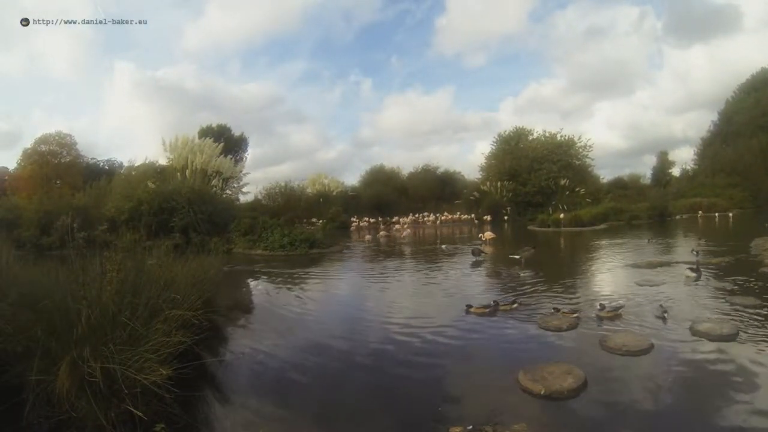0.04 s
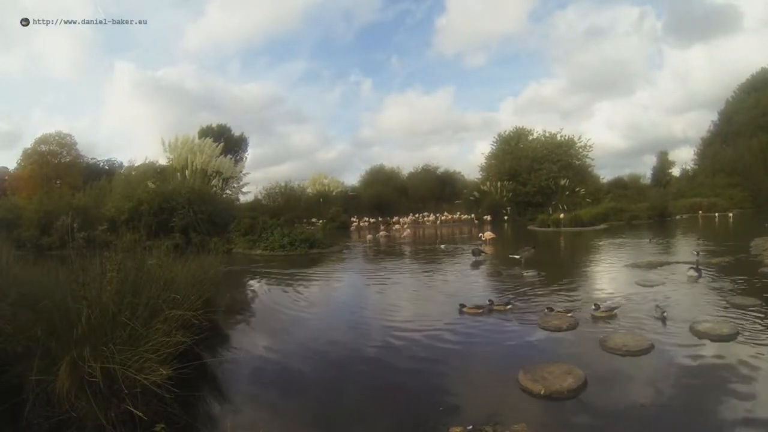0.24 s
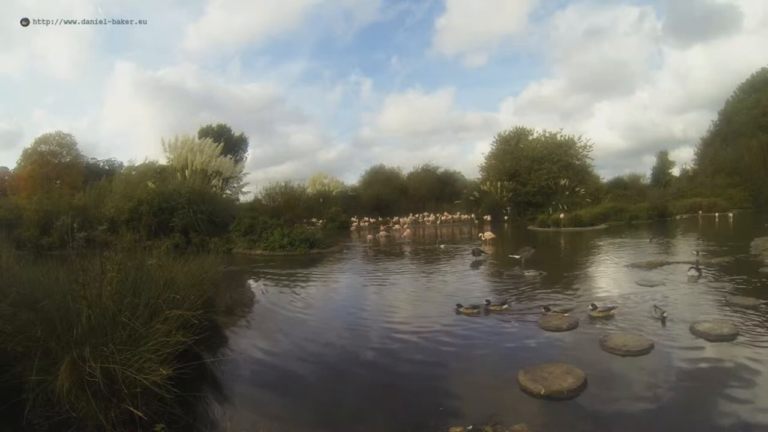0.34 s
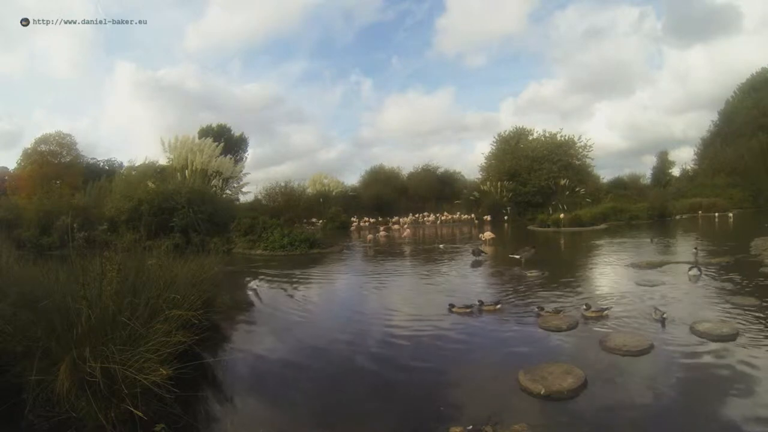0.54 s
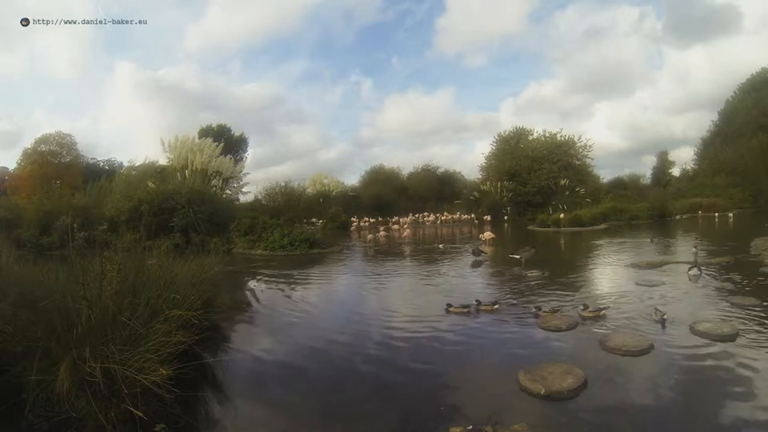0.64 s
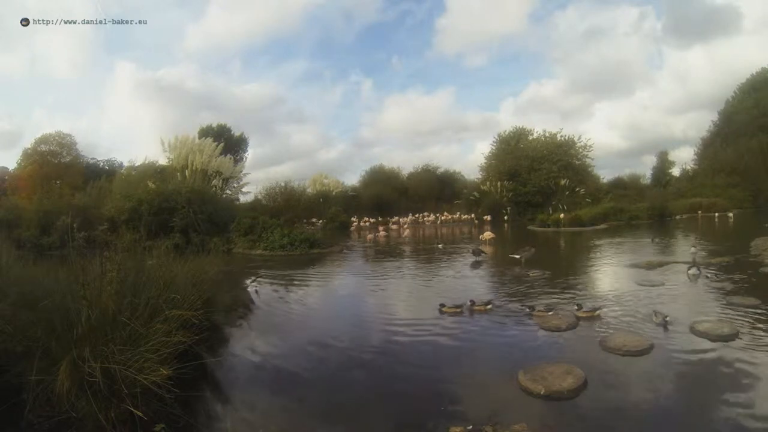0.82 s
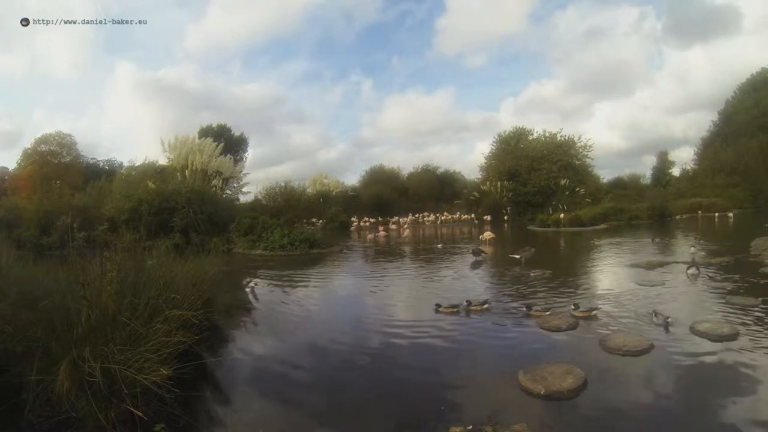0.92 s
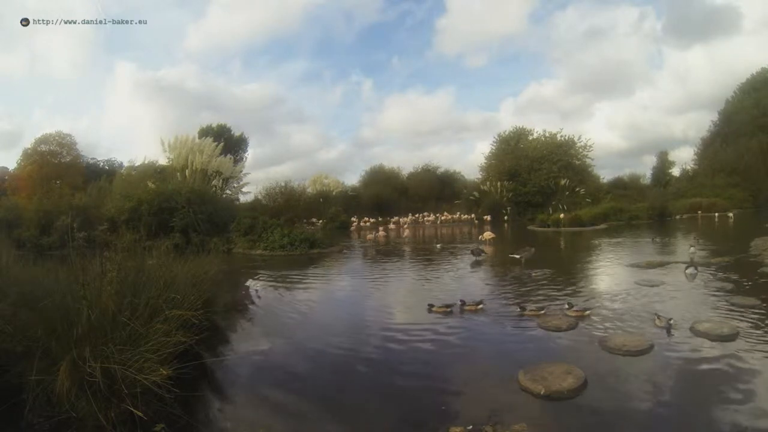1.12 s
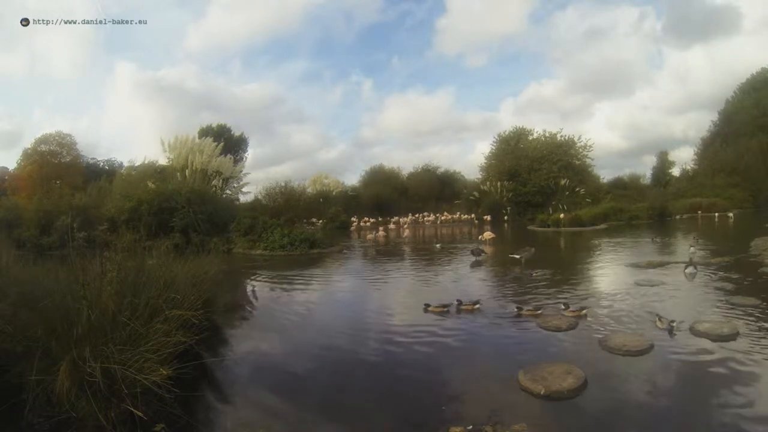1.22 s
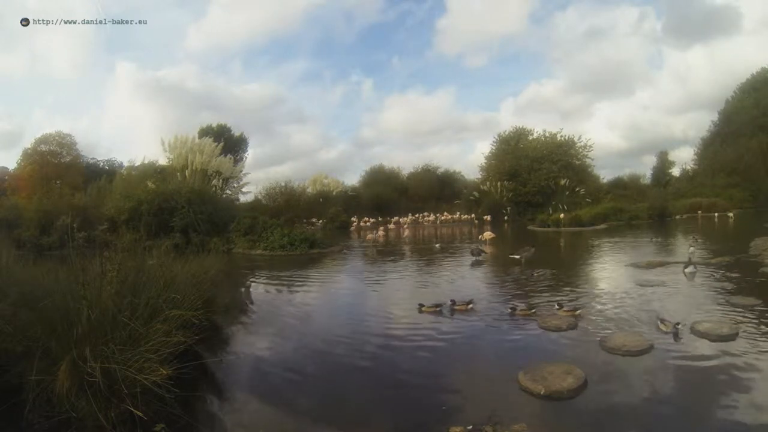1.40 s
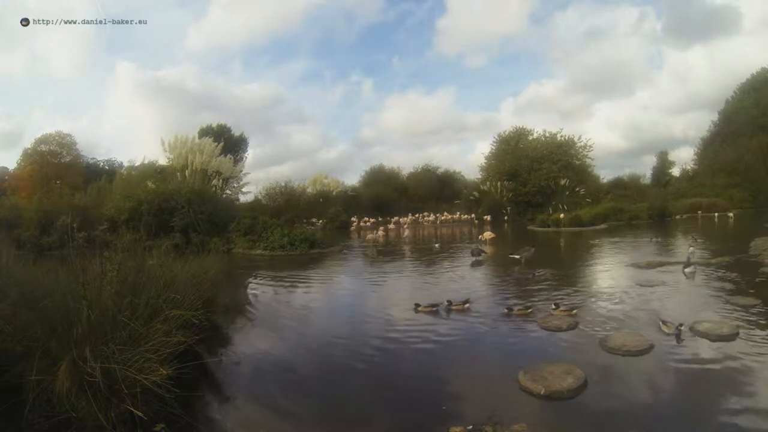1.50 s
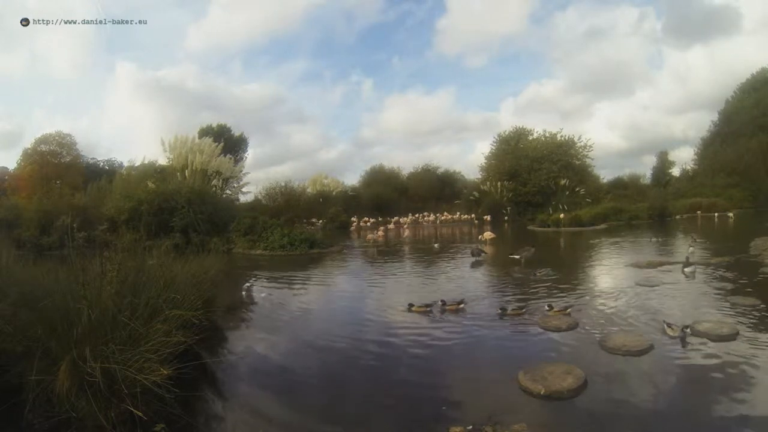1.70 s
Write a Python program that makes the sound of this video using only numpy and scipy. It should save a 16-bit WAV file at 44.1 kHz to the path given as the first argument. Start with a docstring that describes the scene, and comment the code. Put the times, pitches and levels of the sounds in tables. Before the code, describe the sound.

A waterbird honks twice close by on a pond, after faint distant bird calls.

```python
"""A waterbird honks twice, close by on a pond: each honk starts as a pulsed rasp in the throat and
breaks into a clear falling note, and the far bank echoes it. Further off, other birds rattle and
yelp; small birds twitter faintly in the distance. A breeze stirs the reeds, and light wind and soft
bumps reach the microphone, which whines thinly."""
import sys
import numpy as np
from scipy import signal
from scipy.fft import rfft, irfft, next_fast_len
from scipy.io import wavfile

SR = 44100
rng = np.random.default_rng(int(sys.argv[2]) if len(sys.argv) > 2 else 0)


def generate_wav(sig):
    """Save sig (samples, or channels by samples) to the path in sys.argv[1] as 16-bit PCM at SR."""
    pcm = np.round(np.clip(np.atleast_2d(sig).T, -1, 1) * 32767).astype(np.int16)
    wavfile.write(sys.argv[1], SR, pcm)


N = 77175
T = np.arange(N) / SR


def undb(db):
    return 10 ** (np.asarray(db) / 20)


def unit(x):
    return x / np.sqrt(np.mean(x ** 2) + 1e-20)


def noise():
    return rng.standard_normal(N)


def walk(rate_hz):
    """Smooth random drift with an RMS of 1."""
    return unit(irfft(rfft(noise()) / (1 + (np.fft.rfftfreq(N, 1 / SR) / rate_hz) ** 4), N))


def colour(x, points):
    """Minimum-phase filter through (frequency [Hz], gain [dB]) points."""
    hz, db = np.array(points, float).T
    size = next_fast_len(2 * N, True) // 2 * 2
    gain_db = np.interp(np.log(np.fft.rfftfreq(size, 1 / SR) + 1), np.log(hz), db)
    cepstrum = irfft(np.log(undb(gain_db)))
    cepstrum[1:size // 2] *= 2
    cepstrum[size // 2 + 1:] = 0
    return irfft(rfft(x, size) * np.exp(rfft(cepstrum)))[:N]


def band(x, hz, width_hz):
    """A resonance applied twice, scaled to an RMS of 1."""
    b, a = signal.iirpeak(hz, hz / width_hz, fs=SR)
    return unit(signal.lfilter(b, a, signal.lfilter(b, a, x + 1e-18)))


def swell(start, length):
    """A rounded rise and fall."""
    return np.sin(np.pi * np.clip((T - start) / length, 0, 1))


def curve(rows, column=1):
    """One column of a table, interpolated over time."""
    rows = np.array(rows)
    return np.interp(T, rows[:, 0], rows[:, column])


def effort(rows, fade_s=.003):
    """A call's level curve as a gain, closed at both ends."""
    outside = np.maximum(np.maximum(rows[0][0] - T, T - rows[-1][0]), 0)
    return undb(curve(rows, column=2)) * np.exp(-outside / fade_s)


def cycles(hz, jitter):
    """Phase in cycles of a pitch that wavers by the fraction jitter."""
    return np.cumsum(hz * (1 + jitter * walk(160))) / SR


def tone(phase, harmonics_db):
    return unit(sum(undb(db) * np.sin(2 * np.pi * k * phase) for k, db in enumerate(harmonics_db, 1)))


def still_air(level_db=-77.5):
    """The steady hush over the pond."""
    # hush spectrum (frequency [Hz], gain [dB])
    spectrum = [(100, 3), (300, 3), (600, -15.5), (1100, -22.5), (2000, -18), (3500, -15), (5000, -15.5),
                (7000, -24), (9000, -24), (11000, -19), (12500, -26.5), (15500, -31.5)]
    return undb(level_db) * unit(colour(noise(), spectrum))


def reeds(flicker_db=2.5):
    """A breeze rustles the reeds; neighbouring bands swell and fade on their own."""
    # strength of the breeze (time [s], level [dB])
    breeze = [(0, -80), (.15, -77), (.33, -73.5), (.5, -73), (.7, -77), (.9, -77.5), (1.1, -74),
              (1.75, -82.5)]
    # rustle spectrum (frequency [Hz], gain [dB])
    spectrum = [(100, -5.5), (350, 3.5), (800, 1), (1500, -5.5), (3000, -7.5), (5200, -16.5), (7500, -17.5),
                (12000, -38.5)]
    centres_hz = [500, 1200, 2400, 3400, 4400, 5600, 7200]
    rustle, hz = rfft(colour(noise(), spectrum)), np.fft.rfftfreq(N, 1 / SR)
    bands = [irfft(rustle * np.interp(hz, centres_hz, share), N) for share in np.eye(len(centres_hz))]
    return undb(curve(breeze)) * unit(sum(part * undb(flicker_db * walk(8)) for part in bands))


def wind():
    """Light wind rumbles on the microphone."""
    # strength of the rumble (time [s], level [dB])
    gusts = [(0, -64.5), (.1, -68), (.2, -59), (.33, -50), (.43, -57), (.6, -62.5), (.78, -63.5),
             (.9, -59.5), (1.05, -69), (1.25, -69.5), (1.75, -73)]
    # rumble spectrum (frequency [Hz], gain [dB])
    spectrum = [(15, 0), (28, -5.5), (50, -6.5), (95, -9), (140, -12), (200, -20.5), (300, -28.5),
                (600, -50.5), (2000, -88.5)]
    return undb(curve(gusts)) * unit(colour(noise(), spectrum))


def bumps():
    """Soft bumps rock the microphone, each for a few low cycles."""
    # bumps (middle [s], length [s], frequency [Hz], level [dB])
    knocks = [(.253, .06, 132, -49), (.282, .036, 100, -35.5), (.315, .06, 92, -47), (.33, .07, 210, -63),
              (.36, .14, 24, -40), (.385, .09, 72, -52), (.59, .2, 26, -51), (.89, .08, 30, -58)]
    return sum(undb(db) * swell(mid - length / 2, length) ** 2 * unit(np.cos(2 * np.pi * hz * (T - mid)))
               for mid, length, hz, db in knocks)


def distant_birds(flock_db=-82.5):
    """Whistles blurred by distance over the murmur of the flock."""
    # small birds' twitters (middle [s], length [s], frequency [Hz], level [dB])
    twitters = [(0.067, 0.11, 8270, -88), (0.158, 0.083, 8700, -88), (0.199, 0.16, 3060, -78.5),
                (0.245, 0.044, 8330, -85.5), (0.296, 0.36, 2220, -79), (0.306, 0.13, 1536, -75),
                (.30, 0.26, 5100, -82.5), (0.337, .15, 3730, -74), (0.396, 0.13, 8370, -83),
                (0.426, 0.23, 2090, -77), (0.527, 0.036, 7860, -84.5), (0.8, 0.077, 8300, -84.5),
                (0.865, 0.077, 7840, -83), (.88, 0.074, 3270, -83), (0.962, .08, 8500, -86),
                (.965, 0.046, 2130, -78), (1.037, 0.048, 8500, -83.5), (1.072, 0.091, 1460, -80.5),
                (1.196, 0.072, 8700, -86.5), (1.374, 0.1, 3400, -73.5)]
    calls = sum(undb(db) * swell(mid - length / 2, length) * band(noise(), hz, width_hz=.17 * hz)
                for mid, length, hz, db in twitters)
    murmur = undb(flock_db + 2.0 * walk(27)) * band(noise(), 1518, width_hz=480)
    return calls + murmur


def far_rattles(roughness=.4, flutter_db=1.8, pulse_cycles=.36):
    """Birds further off rattle: slow pulses in one throat resonance."""
    # calls (start [s], length [s], level [dB], pulse rate [Hz], resonance [Hz])
    calls = [(0.204, 0.069, -58.5, 122, 1540), (0.444, 0.08, -59.5, 128, 1570),
             (0.674, .066, -61.5, 118, 1600), (0.931, 0.052, -70.5, 115, 1540)]
    out = 0
    for start, length, db, rate, hz in calls:
        phase = cycles(rate, jitter=.092)
        pulses = np.exp(-((phase % 1 - .5) / pulse_cycles) ** 2)
        ring = np.sin(2 * np.pi * cycles(hz, jitter=.038)) + roughness * band(noise(), hz, width_hz=180)
        treble = undb(-32) * band(noise(), 2500, width_hz=2800)
        flutter = undb(flutter_db * walk(66))
        out += undb(db) * swell(start, length) * unit(pulses * (ring + treble) * flutter)
    return out


def far_yelps(roughness=.4, fall_per_s=1.2):
    """Short falling yelps further off, hoarse around their strong second harmonic."""
    # calls (start [s], length [s], level [dB], pitch [Hz])
    calls = [(0.17, 0.038, -58.5, 777), (0.581, 0.035, -62.5, 738)]
    out = 0
    for start, length, db, hz in calls:
        pitch = hz * np.exp(-fall_per_s * np.clip(T - start - length / 2, -length, length))
        hoarse = roughness * band(noise(), 2 * hz, width_hz=360)
        voice = tone(cycles(pitch, jitter=.018), harmonics_db=[-48, 5, -35, -16])
        out += undb(db) * swell(start, length) * (voice + hoarse)
    return out


def banks(x, smear_s=.013, tail_t60_s=.45, tail_db=-22, centre_hz=1910, width_hz=2600):
    """Trees around the pond return smeared echoes and a thin tail."""
    # bank echoes ahead of the band-pass (delay [s], level [dB])
    echoes = [(.047, -29), (.255, -26), (.28, -29)]
    build_up = 1 - np.exp(-T / .03)
    response = undb(tail_db) * unit(noise() * undb(-60 * T / tail_t60_s) * build_up)
    for delay, db in echoes:
        response += undb(db) * unit(noise() * np.exp(-((T - delay) / smear_s) ** 2))
    b, a = signal.iirpeak(centre_hz, centre_hz / width_hz, fs=SR)
    return signal.lfilter(b, a, signal.fftconvolve(x, response / np.sqrt(N))[:N])


def bill_hiss():
    """A sharp hiss as the near bird opens its bill."""
    # hisses (start [s], length [s], level [dB])
    hisses = [(1.185, .025, -69), (1.384, .03, -66)]
    envelope = sum(undb(db) * swell(start, length) for start, length, db in hisses)
    return envelope * band(noise(), 3250, width_hz=800)


def rasp(rows, settle_s=.014, flutter_db=2.3, air_db=-10, hoarse_db=-7):
    """Pulses, each with a puff of air, ring the throat; they start ragged and settle."""
    # throat resonances during the rasp (frequency [Hz], gain [dB])
    throat = [(300, -53.5), (650, -34.5), (830, -18.5), (950, -14.5), (1110, -4), (1220, -7.5), (1350, 4.5),
              (1520, -8), (1710, -7), (1950, -18.5), (2210, -8.5), (2400, -18.5), (2520, -27.5),
              (2850, -26), (3060, -16), (3300, -19), (3480, -19.5), (3900, -42), (5000, -31), (9000, -71),
              (16000, -85)]
    ragged = np.exp(-np.maximum(T - rows[0][0], 0) / settle_s)
    phase = cycles(curve(rows), jitter=.006 + .02 * ragged)
    # Offset, wandering harmonic phases spread each pulse in time.
    pulses = sum(np.cos(2 * np.pi * (k * phase - .085 * k ** 2 + .055 * walk(70))) for k in range(1, 17))
    puffs = unit(noise() * np.exp(-(phase % 1) / .91))
    source = unit(pulses) * undb(flutter_db * walk(160)) + undb(air_db + 8 * ragged) * puffs
    gain = effort(rows)
    hoarse = band(colour(puffs * gain, throat), 1580, width_hz=400)
    voice = unit(colour(source * gain, throat)) + undb(hoarse_db) * hoarse
    return unit(voice) * np.sqrt(np.mean(gain ** 2))


def clear_note(rows, flutter_db=.7, air_db=-18):
    """The voice breaks upward to a clear note and sags, its harmonics sliding through the resonances."""
    # throat resonances during the note (frequency [Hz], gain [dB])
    throat = [(620, -49), (790, -20.5), (1150, -14), (1300, 3.5), (1680, 2.5), (1900, -39), (2100, -13.5),
              (2290, -17.5), (2450, -31.5), (2900, -36), (3150, -40), (3420, -20.5), (3700, -55),
              (5000, -60)]
    # air rushing through the open bill (frequency [Hz], gain [dB])
    bill_air = [(500, -40.5), (1000, -2), (1400, -7), (1750, 6.5), (2100, -14.5), (2800, -13.5), (3450, -2),
                (3900, -21.5), (5000, -21.5), (8000, -39.5), (16000, -66.5)]
    pitch = curve(rows)
    hz, db = np.array(throat).T
    harmonics_db = [np.interp(k * pitch, hz, db) for k in range(1, 7)]
    voice = tone(cycles(pitch, jitter=.005), harmonics_db)
    air = undb(air_db) * unit(colour(noise(), bill_air))
    return (voice * undb(flutter_db * walk(120)) + air) * effort(rows)


def honks(rasp_trim_db=-.64, note_trim_db=-2):
    """The near bird honks twice: hiss and rasp, then the clear note."""
    # the rasp opening each honk (time [s], pulse rate [Hz], level before trim [dB])
    rasps = [
        [(1.189, 238, -58), (1.195, 245, -47), (1.206, 258, -50), (1.216, 271, -44), (1.235, 277, -40),
         (1.25, 281, -41), (1.266, 280, -43), (1.282, 273, -51), (1.30, 259, -60)],
        [(1.388, 226, -66), (1.403, 222, -55), (1.406, 221, -44), (1.42, 217.5, -46.5), (1.436, 214, -49.5),
         (1.448, 210, -52), (1.46, 203, -63)],
    ]
    # the note ending each honk (time [s], pitch [Hz], level before trim [dB])
    notes = [
        [(1.264, 845, -56), (1.274, 832, -40.8), (1.288, 797, -41), (1.302, 752, -41), (1.313, 692, -49),
         (1.322, 668, -49), (1.334, 650, -63)],
        [(1.440, 805, -56), (1.447, 785, -40), (1.454, 760, -38.5), (1.467, 722, -41), (1.476, 700, -48),
         (1.489, 672, -45.5), (1.498, 635, -56), (1.512, 595, -66)],
    ]
    return (bill_hiss()
            + undb(rasp_trim_db) * sum(rasp(rows) for rows in rasps)
            + undb(note_trim_db) * sum(clear_note(rows) for rows in notes))


def scene():
    """One microphone at the pond; honks, rattles and yelps also come back from the banks."""
    birds = honks() + far_rattles() + far_yelps()
    return (birds + banks(birds) + distant_birds() + wind() + bumps() + reeds() + still_air())[None]


def record(dry, whine_hz=11089, whine_db=-91.5, top_hz=15700):
    """The recorder adds a thin whine and cuts the top."""
    whine = undb(whine_db) * unit(np.sin(2 * np.pi * cycles(whine_hz, jitter=.00044)))
    return signal.sosfilt(signal.ellip(8, .2, 70, top_hz, fs=SR, output="sos"), dry + whine)


dry = scene()
out = record(dry)
generate_wav(out)
```